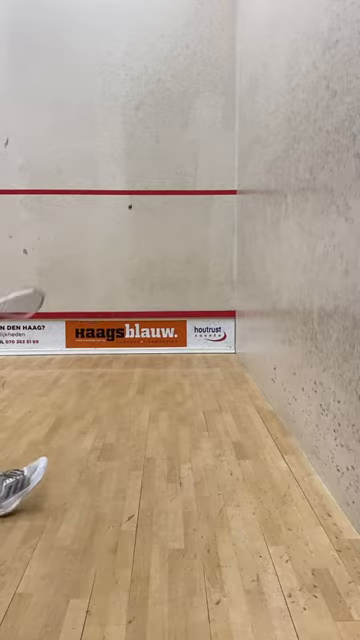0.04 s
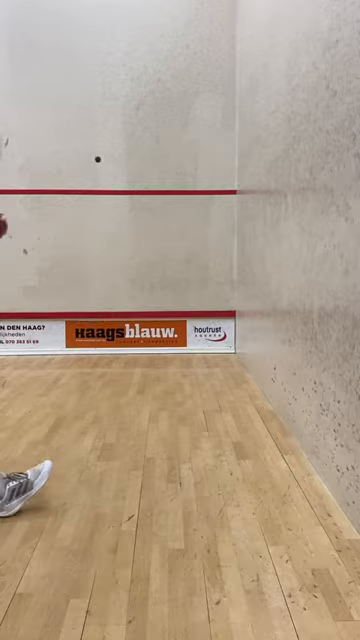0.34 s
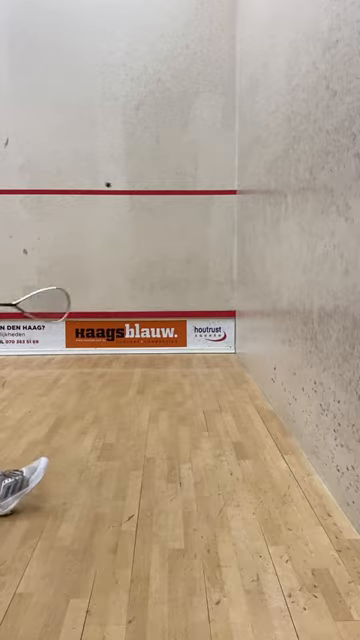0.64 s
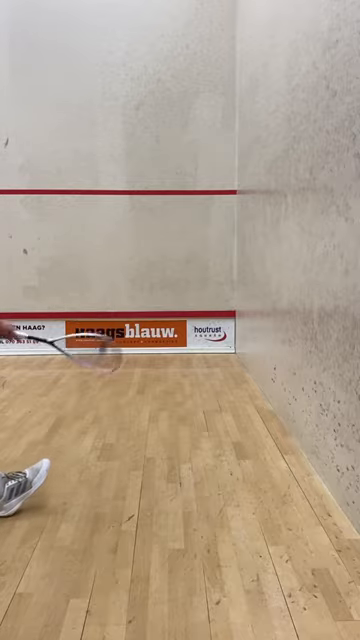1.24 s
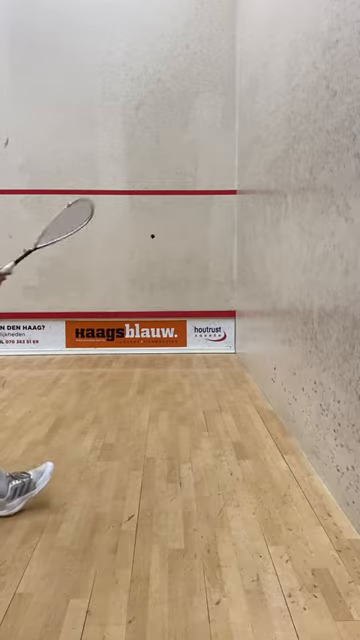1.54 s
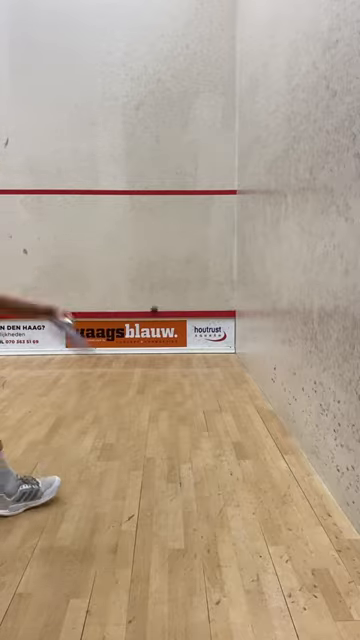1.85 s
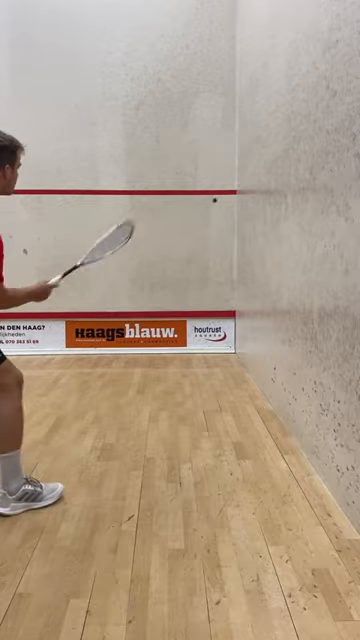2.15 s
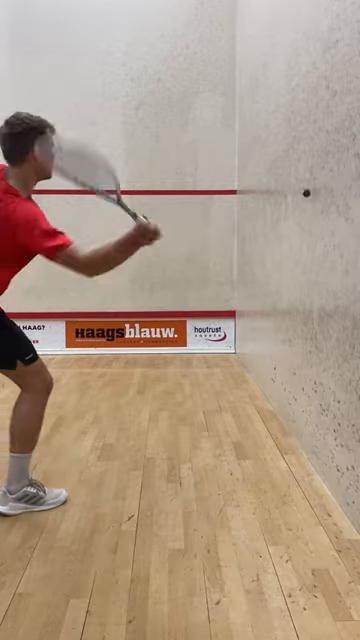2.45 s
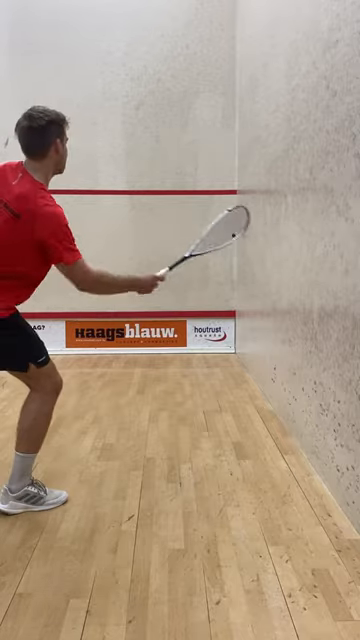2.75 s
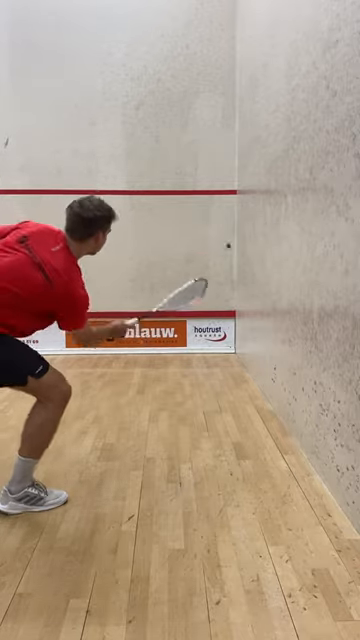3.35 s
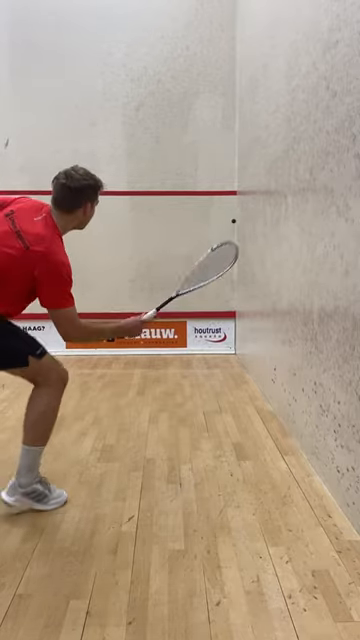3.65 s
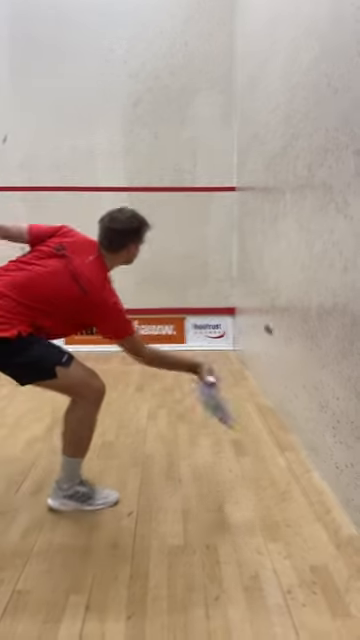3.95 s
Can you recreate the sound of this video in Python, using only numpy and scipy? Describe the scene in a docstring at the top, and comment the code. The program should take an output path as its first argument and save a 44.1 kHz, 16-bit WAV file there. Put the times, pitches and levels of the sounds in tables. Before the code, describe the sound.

A squash ball cracks on a wall six times in a steady rhythm, alternating with hollow racket hits. Heard from a few metres away, the blows echo around a softly rumbling indoor court before one step thuds on wood.

```python
"""A player volleys a squash ball against the front wall of a bare indoor court, a few metres away.
The sound opens on the echo of a stroke just played. The ball cracks on the wall, flutters between front
and back wall and leaves a long boom in the room. Five more strokes follow, each a hollow pock of the
strings with a crack on the wall a moment later. At the end a step thuds on the sprung wooden floor.
The hall rumbles softly throughout."""
import sys
import numpy as np
from scipy import signal
from scipy.fft import rfft, irfft, next_fast_len
from scipy.io import wavfile
from scipy.ndimage import map_coordinates

SR = 44100
rng = np.random.default_rng(int(sys.argv[2]) if len(sys.argv) > 2 else 0)


def master_out(mix):
    """Clip the mix to full scale and print it as 16-bit PCM to the path in sys.argv[1]."""
    frames = np.transpose(np.atleast_2d(mix))
    ceiling = np.clip(frames, -1, 1)
    pcm = np.round(ceiling * 32767).astype(np.int16)
    wavfile.write(sys.argv[1], SR, pcm)


N = 176400
HIT_T = np.arange(SR // 8) / SR  # the seconds within one short blow
ROUND_TRIP_S = .0562  # sound travels to the back wall and returns


def wall_hits():
    """The ball smacks the wall in a burst of clicks, rings with falling pitch and makes it thump."""
    # Each row: start in seconds, crack in dB, ball pitch in Hz, ball ring in dB, its rise in seconds,
    # smack in dB, thump in Hz, then thump, flutter, room tail, extra boom and room ring in relative dB.
    hits = [(0.0618, -2.5, 1297, -6, 0.00126, -14.5, 321, -14.5, -4, 2.5, 1.5, -28.5),
            (0.7387, -2.5, 1222, -10.5, 0.00165, -16, 351.4, -14.5, -9, -1, 4, -32),
            (1.4208, -1, 1599, -12, 0.00126, -18, 325.4, -8, -7, 1.37, 2.5, -28),
            (2.0484, -2.5, 785, -8, 0.00242, -12.5, 331.5, -12, -2, 3.5, -0.5, -32),
            (2.7266, -4, 907, -7.5, 0.00237, -10.5, 293.5, -8.5, -1, 2.5, 3.5, -40),
            (3.4339, -11.5, 1444, -16.5, 0.0014, -22.5, 306, -15, -12, -9, 3, -45)]
    # The tone of the crack, the smack and the room's tail. Each row: frequency in Hz, level in dB.
    crack_tone = [(100, 1.5), (900, 7.5), (2400, 7.5), (3600, 0), (5500, 4.5), (10000, 1), (13000, 0.5),
                  (16000, -8)]
    smack_tone = [(300, -16), (1200, 1), (1800, -4.5), (2400, 4), (3200, -7), (5500, -6.5), (10000, -11),
                  (13000, -15), (16000, -33)]
    tail_tone = [(40, 0), (80, 12.5), (160, 29.5), (270, 39.5), (460, 38), (570, 23.5), (700, 33.5),
                 (830, 26), (980, 31.5), (1500, 26.5), (2000, 23), (2700, 23.5), (3600, 18.5), (5500, 17.5),
                 (7500, 13.5), (10500, 15), (13000, 16.5), (16000, -7)]
    # The clicks of one crack. Each entry: relative level in dB.
    click_levels = [6.5, 1.5, 0.5, -1]
    # The first echoes. Each row: delay in seconds, level in dB, smear in seconds.
    echoes = [(0.0159, -15.5, 0.00078), (0.0198, -6.5, 0.00129), (0.025, -10.5, 0.0048),
              (0.0578, -11.5, 0.0052), (.065, -11, 0.0075)]
    # Notes the room rings at. Each row: pitch in Hz, blur in Hz, level in dB, fade time in seconds.
    room_notes = [(408.1, 14.02, 0, 1.43), (965.5, 60, 0.0014, 1.8)]
    out, crack = np.zeros((2, N)), click(crack_tone)
    for (start, crack_db, ball_hz, ball_db, rise_s, smack_db,
         thump_hz, thump_db, flutter_db, room_db, boom_db, notes_db) in hits:
        hit = amp(ball_db) * ring(ball_hz, rise_s, delay_s=0, octave_drop_s=0.00855)
        hit += amp(thump_db) * ring(thump_hz, rise_s=0.001983, delay_s=0.003104)
        hit += amp(crack_db - 18) * ring(hz=192.1, rise_s=0.004, delay_s=0.002025)  # low thud
        for k, db in enumerate(click_levels):
            jitter_s = abs(rng.normal(0, .00004))
            add(hit, k / ball_hz + jitter_s, amp(crack_db + db) * crack)
        add(out, start, with_echoes(hit, echoes))
        smack = amp(smack_db) * noise(smack_tone, len(HIT_T)) * np.exp(-(HIT_T / 0.003752) ** 2)
        add(out, start - .0007, with_echoes(smack, echoes))
        add(out, start, room_tail(tail_tone, room_db, boom_db, ball_hz))
        add(out, start, amp(notes_db) * ringing_notes(room_notes, rise_s=0.0132))
        add_flutter(out, start, crack, flutter_db)
    return out


def racket():
    """The ball scrapes the strings, which ping; together they give a hollow pock, a thump and a thud."""
    # Each row: start in seconds, scrape, ping and pock in dB, thump in Hz,
    # then thump, thump echo, room tail and extra boom in relative dB.
    strokes = [(-.12, -22, -49, -11.5, 356, -14.5, -16, 0.5, 2.5),
               (0.5242, -22, -40, -18.5, 443, -13, -16, -2.5, 4),
               (1.2497, -18, -34, -12.5, 470, -17, -13.5, 0.82, 4),
               (1.8869, -16, -43.5, -11.5, 362.7, -21, -15.5, 0.1, 5.5),
               (2.5571, -16, -35.5, -8, 392.8, -2.5, -15, 2, 5.5),
               (3.1478, -17, -44.5, -15, 307, -5.5, -22, 0, 6.5)]
    # The tone of the scrape and the room's tail. Each row: frequency in Hz, level in dB.
    scrape_tone = [(300, -38.5), (1200, 7.5), (2200, -1.5), (5000, -3), (10000, -2), (13000, -8),
                   (16000, -27.5)]
    tail_tone = [(40, 2), (80, 9.5), (160, 30), (270, 35), (460, 37), (570, 23.5), (720, 29), (1150, 29),
                 (2000, 16.5), (2600, 21), (3600, 14.5), (5500, 13.5), (7500, 11.5), (10500, 10),
                 (13000, 7), (16000, -16)]
    # Notes of the strings. Each row: pitch in Hz, blur in Hz, level in dB, fade time in seconds.
    string_notes = [(2564, 26, -3, 1.65), (2635, 260, 3.5, 0.5)]
    # The first echoes. Each row: delay in seconds, level in dB, smear in seconds.
    echoes = [(.021, -10.5, 0.0023), (.034, -11, 0.0067), (.066, -12.5, .01)]
    # The walls send the thump back. Each row: delay in seconds, relative level in dB.
    thump_echoes = [(.0222, 0), (.034, -5.5), (.056, -5), (.071, -4)]
    out = np.zeros((2, N))
    for start, scrape_db, ping_db, pock_db, thump_hz, thump_db, echo_db, room_db, boom_db in strokes:
        scrape = amp(scrape_db) * noise(scrape_tone, len(HIT_T)) * fade(HIT_T, fade_s=0.0356)
        add(out, start, amp(ping_db) * ringing_notes(string_notes, rise_s=0.00146))
        pock_hz = 763.5
        pock = ring(pock_hz, rise_s=0.00251, delay_s=0.0019016)
        pock += amp(-9) * ring(hz=1159, rise_s=0.00283, delay_s=0.002044)
        thump = amp(thump_db) * ring(thump_hz, rise_s=0.002256, delay_s=0.003224)
        thud = amp(-17.5) * ring(hz=158.9, rise_s=0.00364, delay_s=0.00603)
        add(out, start, with_echoes(scrape + amp(pock_db) * pock + thump + thud, echoes))
        for delay, db in thump_echoes:
            add(out, start + delay, amp(echo_db + db) * ring(hz=320.3, rise_s=0.00324, delay_s=0))
        add(out, start, room_tail(tail_tone, room_db, boom_db, pock_hz))
    return out


def footstep(rise_s=0.0079):
    """Heel and sole set the sprung floor booming."""
    # Heel, then sole. Each row: start in seconds, level in dB.
    landings = [(3.786, -20.5), (3.842, -20)]
    # Notes of the floor boards. Each row: pitch in Hz, level in dB, fade time in seconds.
    boards = [(51.63, -4.5, 0.53), (77.5, 6, 0.139), (111.5, -3.5, 0.167)]
    out, t = np.zeros(N), np.arange(SR) / SR
    thud = sum(amp(db) * np.sin(2 * np.pi * hz * t) * fade(t, fade_s) for hz, db, fade_s in boards)
    thud *= 1 - np.exp(-t / rise_s)
    for start, db in landings:
        add(out, start, amp(db) * thud)
    return out


def add_flutter(track, start, crack, db, loss_db=5):
    """The crack bounces between front and back wall, weaker on each trip."""
    returned = dull(crack, above_hz=14000)
    for trip in range(3):
        echo = signal.fftconvolve(returned, smear(smear_s=.0005))
        add(track, start + (trip + 1) * ROUND_TRIP_S, amp(db + 3 - loss_db * trip) * echo)


def with_echoes(sound, echoes):
    """The sound arrives directly, then as smeared, slightly dull echoes."""
    response = np.zeros(len(HIT_T))
    for delay, db, smear_s in echoes:
        add(response, delay, amp(db) * smear(smear_s))
    response = dull(response, above_hz=6030)
    response[0] += 1  # the direct path
    return signal.fftconvolve(sound, response)


def room_tail(tone, room_db, boom_db, ring_hz):
    """Countless echoes of one blow blend and build up; the middle pitches linger longest."""
    # How long the room rings. Each row: frequency in Hz, fade time in seconds.
    fade_times = [(60, 0.04), (250, 3), (600, 3.5), (1200, 4), (2500, 2.5), (5000, 2.5), (10000, 1.134),
                  (15000, 0.4343)]
    # How alike left and right are. Each row: frequency in Hz, likeness from 0 to 1.
    likeness = [(170, .998), (300, .93), (400, .8), (600, .4), (1050, .15), (2000, .78), (3200, .6),
                (4400, .62), (5000, .85), (6400, .86), (7400, .995), (8900, .72), (10400, .99),
                (11900, .72), (13600, .98), (15000, .6)]
    hz, t = np.fft.rfftfreq(512, 1 / SR), np.arange(420) * 256 / SR
    spread = np.arccos(np.clip(along(likeness, hz), -1, 1)) / 2
    ring_db = 2.5 * np.exp(-(np.log2((hz + 1) / ring_hz) / 0.347) ** 2)  # the blow's pitch stands out
    bass_db = boom_db / (1 + (hz / 554) ** 4)
    gain = amp(along(tone, hz) + ring_db + room_db + bass_db)
    # Two noises, split into bands: one that left and right share, one that sets them apart.
    bands = signal.stft(rng.standard_normal((2, (len(t) - 1) * 256)), nperseg=512)[2]
    bands *= (gain * [np.cos(spread), np.sin(spread)])[..., None]
    bands *= fade(t, along(fade_times, hz)[:, None])
    shared, apart = signal.istft(bands, nperseg=512)[1] / np.sqrt(SR)
    age = np.maximum(np.arange(len(shared)) / SR - 0.00406, 0)  # starts after a tiny gap
    build_up = 1 - np.exp(-age / 0.01734)
    surge_db = np.cos(2 * np.pi * (age - 0.01715) / ROUND_TRIP_S)  # one swell per round trip
    return np.array([shared + apart, shared - apart]) * build_up * amp(surge_db)


def hall_rumble():
    """The hall gives a low, softly wavering noise."""
    # The rumble's tone. Each row: frequency in Hz, level in dB.
    tone = [(20, -46.5), (35, -39), (52, -1), (85, -6.5), (120, -12.5), (300, -7.5), (700, -21.5),
            (2000, -29), (6000, -45), (15000, -60.5)]
    return amp(-37 + 2.5 * wobble(rate=18, size=N)) * noise(tone, N)


def ring(hz, rise_s, delay_s, octave_drop_s=np.inf):
    """A struck thing swings, most strongly after rise_s, and stops quickly; its pitch may fall."""
    t = np.maximum(HIT_T - delay_s, 0)
    rise = t / rise_s
    pitch = hz / (1 + (t / octave_drop_s) ** 2)
    cycles = np.cumsum((t > 0) * pitch) / SR
    return rise ** 2 * np.exp(2 * (1 - rise)) * np.sin(2 * np.pi * cycles)


def ringing_notes(notes, rise_s):
    """Notes, blurred by the room, swell and die away within a second."""
    out, t = np.zeros(SR), np.arange(SR) / SR
    for hz, blur_hz, db, fade_s in notes:
        phase = 2 * np.pi * hz * t + np.pi / 2 * wobble(blur_hz, SR)
        out += amp(db) * np.sin(phase) * fade(t, fade_s)
    return out * (1 - np.exp(-t / rise_s)) * (1 - t ** 4)


def click(tone, size=4096):
    """One sharp pulse with the given tone."""
    gain = amp(along(tone, np.fft.rfftfreq(size, 1 / SR)))
    folded = irfft(np.log(gain))
    # Folding the second half onto the first packs the energy at the start of the pulse.
    folded[1:size // 2] *= 2
    folded[size // 2 + 1:] = 0
    pulse = irfft(np.exp(rfft(folded)))
    return np.pad(pulse, (0, len(HIT_T) - size))


def smear(smear_s):
    """A short scatter of echoes with a total energy of 1."""
    echo = rng.standard_normal(len(HIT_T)) * np.exp(-HIT_T / smear_s)
    return echo / np.linalg.norm(echo)


def noise(tone, size):
    """Noise with the given tone and a typical size of 1."""
    x = filtered(rng.standard_normal(size), lambda hz: amp(along(tone, hz)))
    return x / x.std()


def wobble(rate, size):
    """A smooth curve through `rate` random values a second."""
    return map_coordinates(rng.standard_normal(2048), [np.arange(size) * rate / SR], mode="mirror")


def fade(t, fade_s):
    """Die away by 60 dB in each fade time."""
    return np.exp(-np.log(1000) * t / fade_s)


def dull(x, above_hz):
    """Soften the treble."""
    return filtered(x, lambda hz: 1 / (1 + 1j * hz / above_hz))


def filtered(x, response):
    """Multiply each frequency in a sound by response(hz)."""
    size = x.shape[-1]
    padded = next_fast_len(size + SR // 20)
    hz = np.fft.rfftfreq(padded, 1 / SR)
    return irfft(rfft(x, padded) * response(hz), padded)[..., :size]


def along(points, hz):
    """Read between the rows of a frequency table, spaced by octaves."""
    frequencies, values = np.transpose(points)
    return np.interp(np.log(hz + 1), np.log(frequencies + 1), values)


def amp(db):
    """Turn decibels into a multiplier."""
    return 10 ** (np.asarray(db) / 20)


def add(track, start_s, sound):
    """Mix a sound into a track, dropping what falls outside it."""
    start = round(start_s * SR)
    part = sound[..., max(-start, 0):track.shape[-1] - start]
    track[..., max(start, 0):max(start, 0) + part.shape[-1]] += part


def scene():
    """The rally and the step over the rumble of the hall."""
    return hall_rumble() + wall_hits() + racket() + footstep()


def record(dry):
    """The stereo sound leans slightly left or right by pitch, and the left treble runs ahead;
    peaks are rounded and the highest treble is cut."""
    # How much louder the left side is. Each row: frequency in Hz, level in dB.
    balance = [(80, -0.27), (350, -1.25), (700, -1), (1400, 0.48), (2800, -0.6), (8000, 0)]
    # How far the left side's wave runs ahead. Each row: frequency in Hz, phase in radians.
    lead = [(1700, 0), (2700, 1), (3800, .65), (4400, .85), (5000, .2), (6000, 1.55), (6900, 2.95),
            (7400, 3.14), (8000, 3.6), (9600, 5.75), (10400, 6.28), (13000, 9.05), (13700, 9.45),
            (16000, 11.9)]
    half = np.array([[.5], [-.5]])  # left gains half, right loses half
    x = filtered(dry, lambda hz: amp(half * along(balance, hz)) * np.exp(1j * half * along(lead, hz)))
    x = x / (1 + (x / .8) ** 4) ** (1 / 4)
    return filtered(x, lambda hz: np.clip((16800 - hz) / 900, 0, 1))


dry = scene()
out = record(dry)
master_out(out)
```